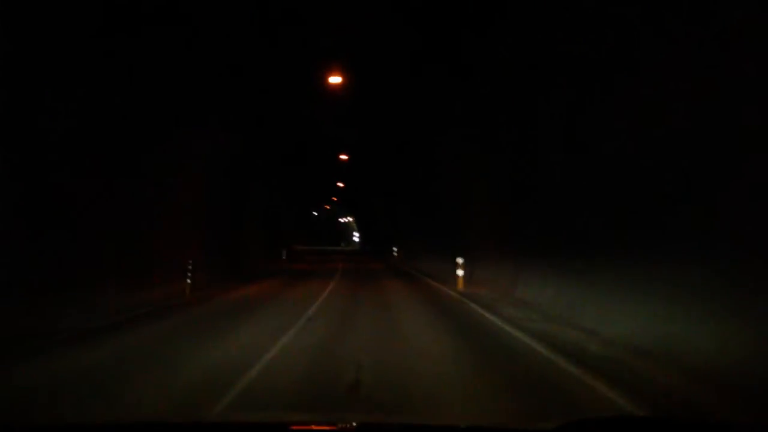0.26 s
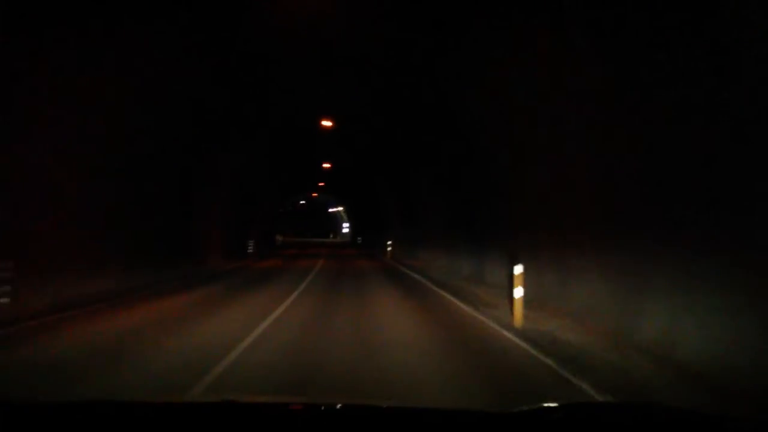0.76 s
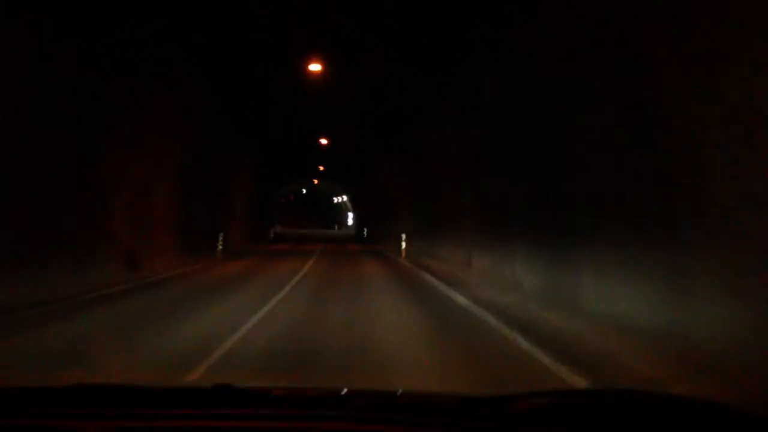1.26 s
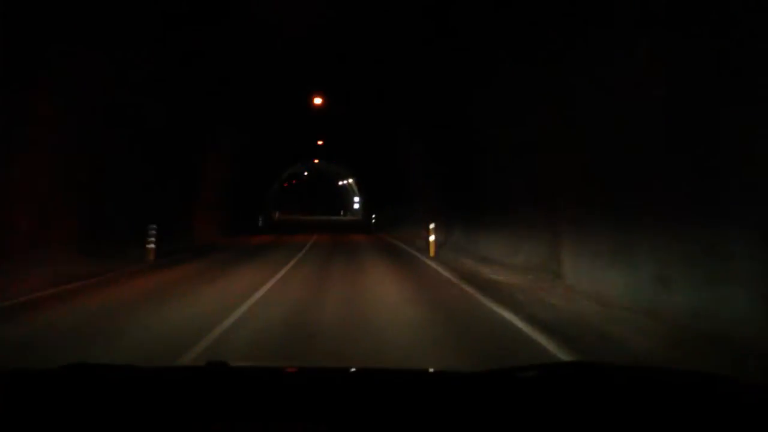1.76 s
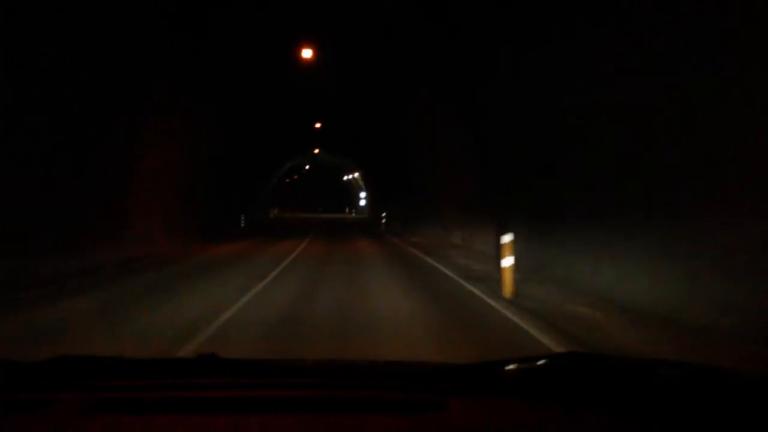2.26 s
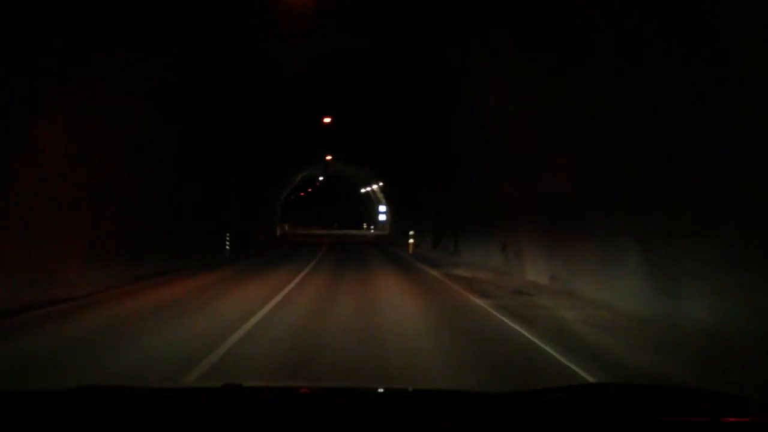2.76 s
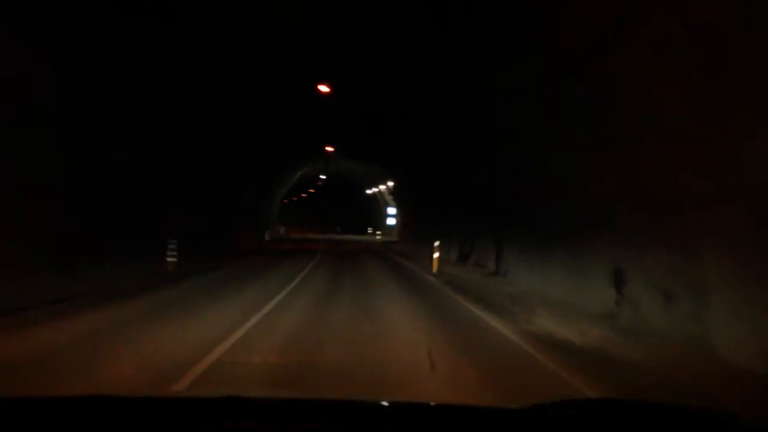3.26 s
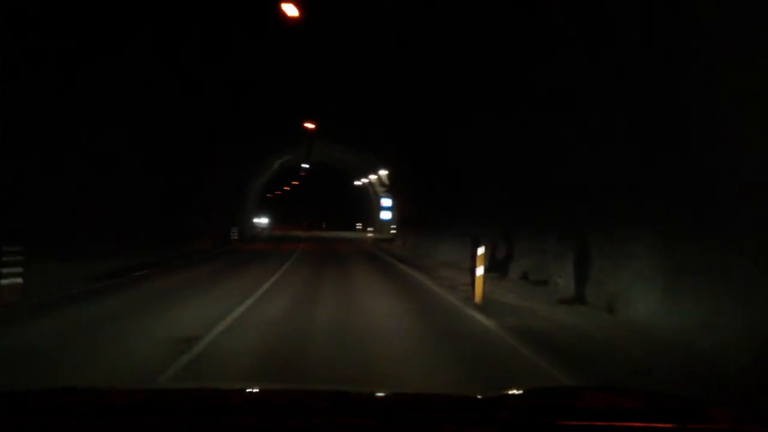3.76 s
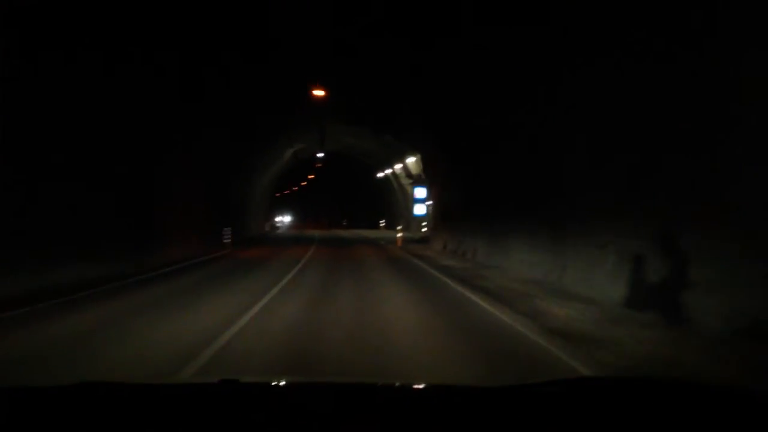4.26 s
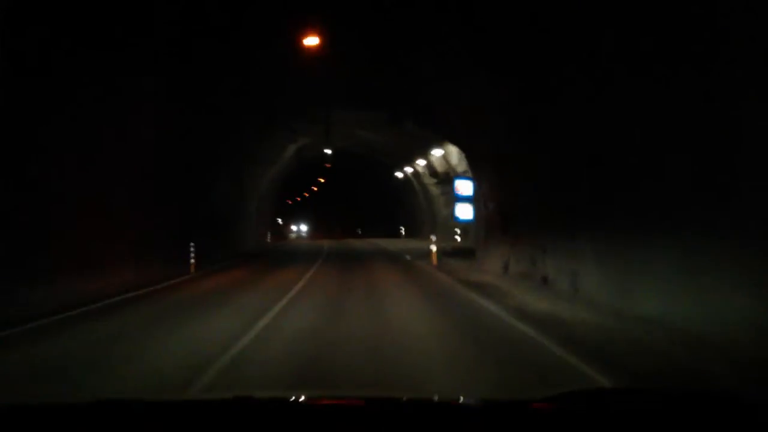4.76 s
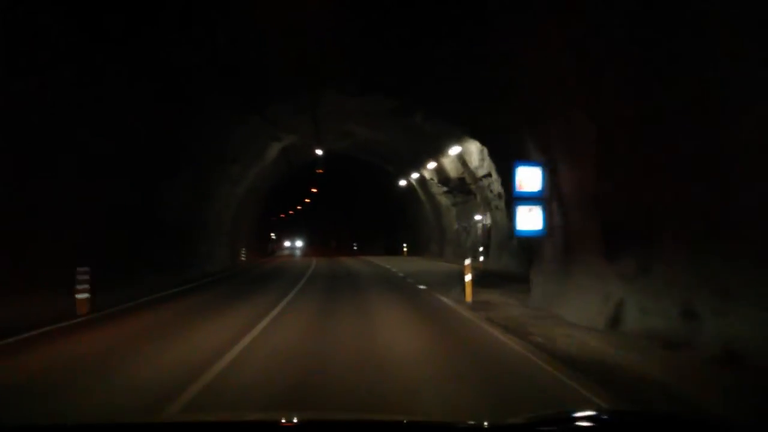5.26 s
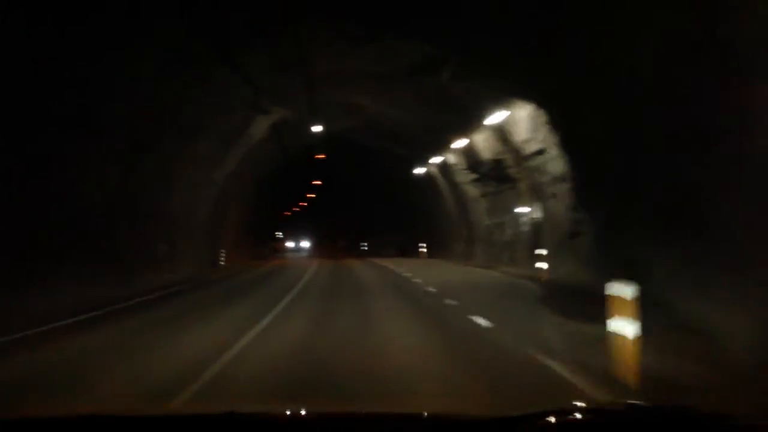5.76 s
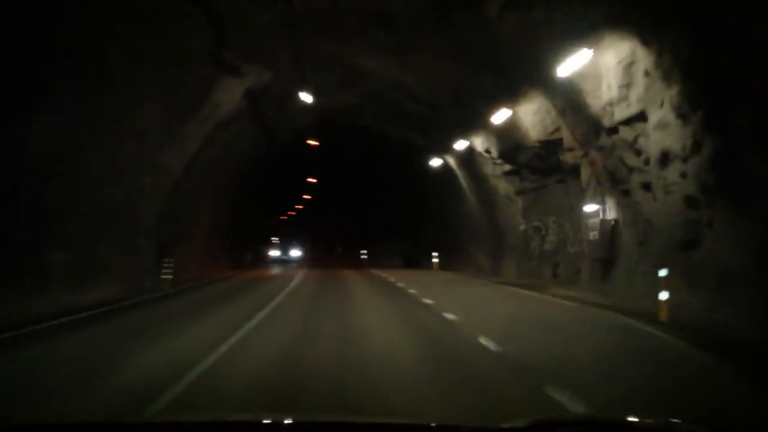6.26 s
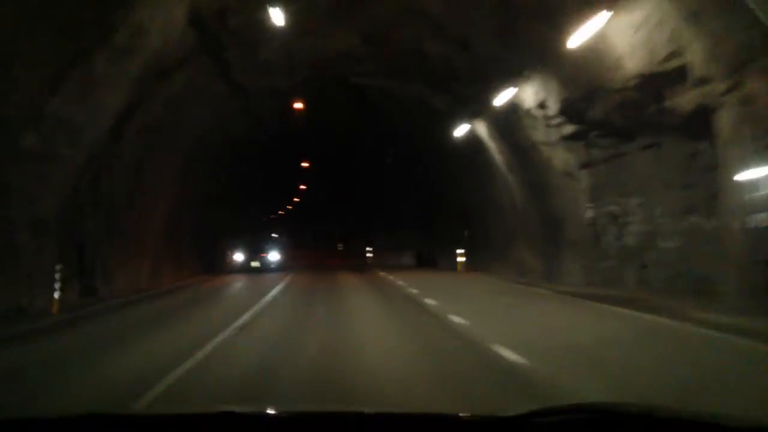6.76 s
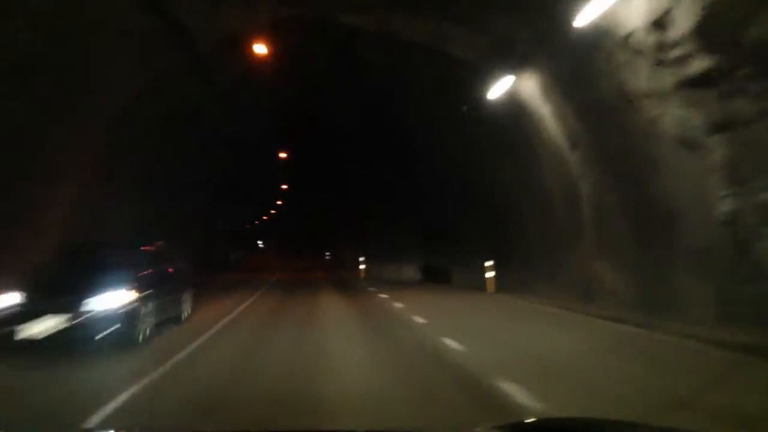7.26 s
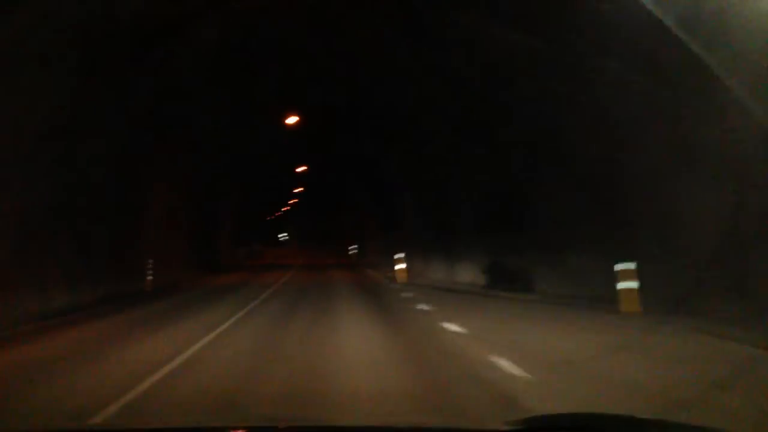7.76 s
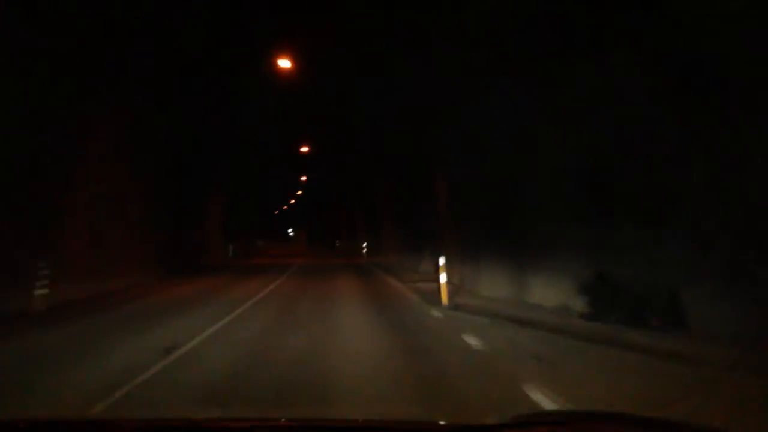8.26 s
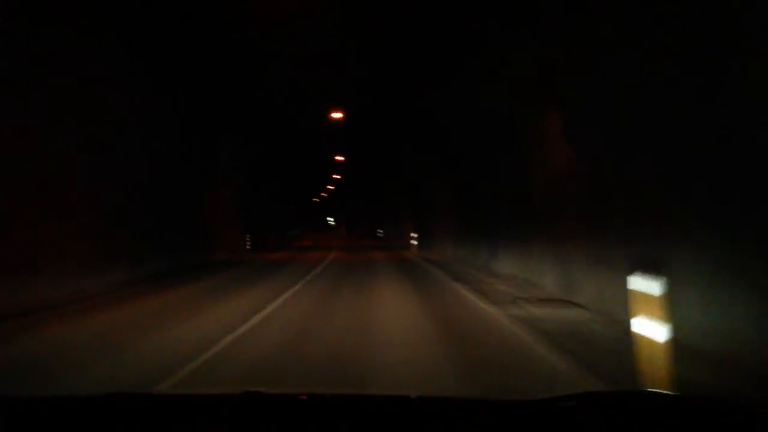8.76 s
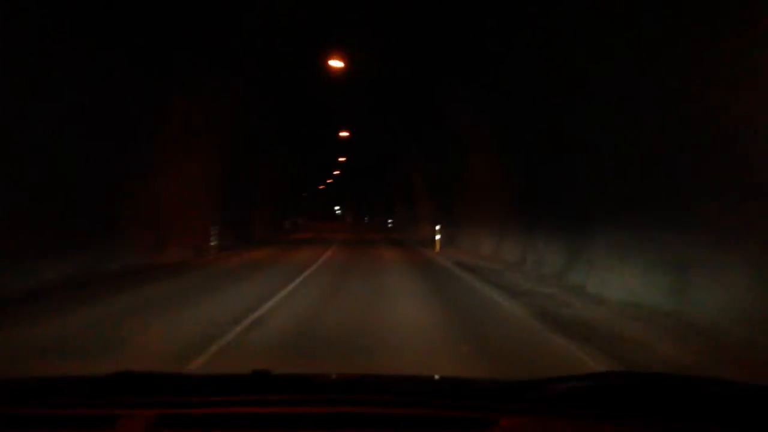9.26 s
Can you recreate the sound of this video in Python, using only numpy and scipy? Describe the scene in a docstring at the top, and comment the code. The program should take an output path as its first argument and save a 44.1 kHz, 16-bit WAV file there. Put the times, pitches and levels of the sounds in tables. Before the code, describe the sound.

A microphone behind the windscreen catches a car driving steadily through a tunnel. Low boomy rumble and tyre roar dominate, treble dulled by the glass. Soft thuds cluster in the middle, with a sharp little click around three and a half seconds. Another car's roar builds slowly, rushes by in a brief buffeting whoosh just before eight seconds, then drops away to calmer cruising.

```python
"""Inside a car cruising through a rock tunnel: rough asphalt booms in the cabin over a low engine drone.
Bumps thud, tyres roar and air hisses at the seals: noise shaped by resonances, over sine waves for the engine.
From about 2.4 s something in the cabin ticks a few times, each a short burst of noise in one resonance,
the loudest (near 3.49 s) in two at once. The road turns smoother near 7 s, just as an oncoming car swells up;
it whooshes past, abreast near 7.7 s, as several bands of noise that rise and fall around that moment."""
import sys
import numpy as np
from scipy import signal
from scipy.fft import rfft, irfft
from scipy.io import wavfile
from scipy.ndimage import uniform_filter1d, map_coordinates

SR = 44100
rng = np.random.default_rng(int(sys.argv[2]) if len(sys.argv) > 2 else 0)


def persist_wave(psi):
    """Save psi, clipped to +-1, as 16-bit WAV."""
    counts = np.round(np.clip(psi, -1, 1) * 32767).astype(np.int16)
    wavfile.write(sys.argv[1], SR, np.atleast_2d(counts).T)


N = 419832
TIME = np.arange(N) / SR  # seconds
HZ = np.fft.rfftfreq(N, 1 / SR)

# booming resonances of the body and cabin air: columns pitch_hz, width_hz, relative_db
BOOM_MODES = [(101.9, 11.6, -2), (137.2, 12.2, 0.5), (155, 17, -7.5), (182.8, 27.5, -5), (219.4, 23, -10),
              (246.6, 21, -10)]
# drumming resonances of the panels: columns pitch_hz, width_hz, relative_db
DRUM_MODES = [(247, 24, -1.6), (307.6, 29, 0.92)]
# humming resonances of the tyre walls: columns pitch_hz, width_hz, relative_db
WALL_MODES = [(390.2, 44.3, 0.54), (417, 36, -11), (488, 42.5, -3.5), (567, 41, -11.5)]
# sharper bumps in the asphalt: columns start_s, relative_db, broken_patch_s (length of the patch behind)
BUMPS = [(0.016, -12, .3), (1.148, -14, .045), (1.59, -17, .03), (2.369, -11, 0.035), (2.62, -10, 0.099),
         (2.834, -6.5, .07), (3.03, -11.5, 0.14), (3.44, -9, 0.032), (3.748, -8, .051), (4.071, -8.5, 0.18),
         (4.25, -9.5, 0.066), (5.105, -8, 0.075), (5.741, -10.5, 0.036), (6.236, -6, 0.064),
         (6.312, -8.5, 0.08), (6.433, -10.5, 0.032), (6.78, -16, .1), (8.988, -16, .064)]


def gain_of(db):
    """Turns decibels into amplitude."""
    return 10 ** (np.asarray(db) / 20)


def level(rows, axis=1):
    """Gain along time, drawn through one dB column of a table whose first column is time."""
    columns = np.transpose(rows)
    return gain_of(np.interp(TIME, columns[0], columns[axis]))


def noise(colour):
    """Noise of rms 1 with the given strength at each frequency."""
    x = irfft(rfft(rng.standard_normal(N)) * colour, N)
    return x / np.std(x)


def drift(hz):
    """Slow random curve of rms 1, with changes up to about hz times a second."""
    coarse = TIME[::50]
    rates = np.fft.rfftfreq(len(coarse), coarse[1])
    slow_only = np.exp(-(rates / hz) ** 2)
    x = irfft(rfft(rng.standard_normal(len(coarse))) * slow_only, len(coarse))
    return np.interp(TIME, coarse, x / np.std(x))


def spectrum(points):
    """Strength at each frequency, drawn through (Hz, dB) points and falling away beyond both ends."""
    hz, db = np.transpose(points)
    skirts = np.minimum(HZ / hz[0], 1) ** 2 / np.maximum(HZ / hz[-1], 1) ** 4
    return gain_of(np.interp(np.log(HZ + 1), np.log(hz), db)) * skirts


def resonances(modes):
    """Strength at each frequency of a set of steep-sided resonances, added as power."""
    power = 0
    for hz, width, db in modes:
        power = power + gain_of(db) ** 2 / (1 + ((HZ - hz) / width) ** 2) ** 2
    return np.sqrt(power)


def wandering(x, spread=.022, hz=3):
    """Lets a sound's pitch drift up and down by a small share, by reading it at an uneven speed."""
    place = np.cumsum(1 + spread * drift(hz))
    return map_coordinates(x, [place], order=3, mode="wrap")


def scattered(x, patchy_db=2.6, smooth_hz=2800):
    """Echoes off the passing rock walls strengthen and cancel narrow bands in turn; the treble stays smooth."""
    hz, _, z = signal.stft(x, nperseg=2048, noverlap=1536, boundary="even")
    # random patches, blurred over 4 bands and 8 time steps
    patches = uniform_filter1d(rng.standard_normal(z.shape), size=4, axis=0)
    patches = uniform_filter1d(patches, size=8, axis=1)
    depth_db = patchy_db / np.hypot(1, (hz[:, None] / smooth_hz) ** 2)
    gains = gain_of(depth_db * patches / np.std(patches))
    y = signal.istft(z * gains, nperseg=2048, noverlap=1536)[1][:N]
    return y / np.std(y)


def glass(hz=2580):
    """Side windows and trim shut out the treble steeply above hz."""
    return 1 / np.sqrt(1 + (HZ / hz) ** 16)


def swell(s, width_s):
    """A bell-shaped rise and fall around one moment."""
    return np.exp(-((TIME - s) / width_s) ** 2)


def surface(axis=1, joint_s=0.025):
    """One column of the asphalt table along time; the wheels cross each joint quickly."""
    # stretches of asphalt under the wheels: columns start_s, coarseness_db, panel_drumming_db (relative),
    # high_note_share (0-1, part of the tread roar's power in its higher note)
    stretches = [(0, -23.5, -35, 0.21), (.62, -25, -34.5, 0.33), (1.7, -28.5, -33, 0.58),
                 (2.2, -31, -31.5, .5), (2.36, -24.5, -34.5, 0.28), (4.35, -23, -31, 0.1),
                 (4.7, -23.5, -34.5, 0.21), (5.6, -24, -39.5, 0.1), (6.55, -25, -39, .14),
                 (6.92, -28.5, -46, 0), (7.7, -32.5, -46, 0.02), (8.98, -28, -38, 0.09)]
    columns = np.transpose(stretches)
    value = columns[axis][0]
    for s, step in zip(columns[0][1:], np.diff(columns[axis])):
        value = value + step * (1 + np.tanh((TIME - s) / joint_s)) / 2
    return value


def road_force(broken_db=-11.0, attack_s=0.0094):
    """The asphalt's steady texture, plus a surge over the broken patch behind each bump."""
    power = gain_of(surface()) ** 2
    for s, db, length in BUMPS:
        t = np.maximum(TIME - s, 0)
        patch = np.minimum(t / attack_s, 1) * np.exp(-(t / length) ** 4)
        power = power + (gain_of(db + broken_db) * patch) ** 2
    return np.sqrt(power)


def rocking(steady_db=-25.0, uneven_db=2.0, follows=0.34):
    """The body always shakes a little, more on coarse asphalt, and heaves in each dip."""
    # dips in the road that rock the body: columns middle_s, half_length_s, relative_db
    dips = [(.07, 0.089, -24.5), (0.347, .09, -22.5), (0.584, 0.059, -25.5), (1.502, 0.18, -24),
            (2.547, 0.24, -22.5), (3.323, 0.098, -26), (3.774, 0.078, -20), (4.528, 0.099, -28),
            (9.297, 0.23, -27.5)]
    # follows: dB of steady shake per dB of coarseness
    power = gain_of(steady_db + follows * surface() + uneven_db * drift(5.5)) ** 2
    for s, width, db in dips:
        power = power + (gain_of(db) * swell(s, width)) ** 2
    return np.sqrt(power)


def rumble(lumpy_db=1.5, shake_db=-1.5, wall_db=-1.05, drum_db=-0.56, grit_waver_db=2.5, drum_follows=.45):
    """Uneven asphalt drives the body, the cabin air, the panels and the tyre walls."""
    # low shaking resonances of the body: columns pitch_hz, width_hz, relative_db
    shake_modes = [(28.2, 6.6, -1), (38, 10, -6.5), (52.8, 5.9, 1.5), (73.4, 7.5, -5.5)]
    # tyre walls' hum, which follows the fine grit of the road: columns time_s, relative_db
    grit = [(0, -30.5), (.55, -32), (1.3, -29.5), (1.55, -34), (2.2, -35), (2.48, -38), (2.95, -34),
            (3.4, -34.5), (4.03, -38.5), (4.4, -31), (4.8, -39), (5.25, -34.5), (5.7, -36.5), (6.02, -30.5),
            (6.22, -37.5), (6.65, -30.5), (7.1, -34), (7.5, -37.5), (8.5, -39.5), (9.05, -34), (9.5, -36)]
    force = road_force()
    boom = noise(resonances(BOOM_MODES)) * force * gain_of(lumpy_db * drift(14))
    shake = noise(resonances(shake_modes)) * rocking() * gain_of(shake_db)
    # broken patches shake the panels too
    surge = (force / gain_of(surface())) ** drum_follows
    drumming = surge * gain_of(surface(axis=2) + drum_db + lumpy_db * drift(12))
    panels = wandering(noise(resonances(DRUM_MODES)), spread=.04) * drumming
    hum_level = level(grit) * gain_of(wall_db + grit_waver_db * drift(16))
    walls = wandering(noise(resonances(WALL_MODES)), spread=.03) * hum_level
    return boom + shake + panels + walls


def engine(crank_hz=26.15, wander=0.00299, waver_db=2.0):
    """A four-cylinder at nearly steady low revs: sine waves at multiples of its turning speed, each wavering."""
    # engine tones: columns multiple_of_crank_speed, rms_db (middle of the waver)
    orders = [(1, -40.5), (2, -41.5), (4, -43), (6, -43), (14, -49.5)]
    turns = np.cumsum(crank_hz * (1 + wander * drift(1.19))) / SR
    drone = np.zeros(N)
    for multiple, db in orders:
        tone = np.sin(2 * np.pi * (multiple * turns + rng.random()))
        drone += np.sqrt(2) * gain_of(db + waver_db * drift(7.6)) * tone  # root 2: sine peak from rms
    return drone


def rush(tread_db=3.5, air_db=-3.0, flutter_db=1.29, air_flutter_db=1.0, fizz_waver_db=1.5):
    """Tread roar muffled by the glass, with hiss and fizz leaking through the seals."""
    # tread resonances, lower and higher note: columns pitch_hz, width_hz, relative_db
    low_modes = [(596, 46, -5.5), (730, 58, -2.5), (792, 45, 0), (871, 56, 0), (991, 52, -5.5),
                 (1131, 38, -8.5), (1271, 88, -12.5), (1416, 92, -16.5), (1674, 100, -12.5),
                 (1898, 140, -19), (2105, 354, -23.5)]
    high_modes = [(880, 68, -1.5), (997, 54, 6.5), (1137, 60, 0), (1210, 66, -15)]
    # tread roar and air hiss along time: columns time_s, tread_relative_db, air_relative_db
    rush_levels = [(0, -41.5, -60), (.5, -40.5, -60), (1.1, -41, -61.5), (1.6, -39.5, -63),
                   (2.2, -41, -64.5), (2.45, -42.5, -65), (2.9, -43.5, -65.5), (3.3, -43, -63.5),
                   (3.68, -41, -59.5), (4.3, -41.8, -64), (4.55, -43, -67), (5.1, -42.5, -65),
                   (5.45, -38.5, -63), (5.64, -40, -60.5), (5.9, -39.5, -61.7), (6.4, -37, -62.3),
                   (7.05, -38.5, -60.5), (8.1, -39.5, -60.5), (9, -39.5, -62), (9.25, -38.5, -60.5),
                   (9.5, -40, -59.5)]
    # colour of the air hiss, then of the thin fizz at the seals: columns pitch_hz, relative_db
    air_colour = [(2000, -9.5), (2900, -4), (3220, -8.5), (3550, -5), (3950, -1.5), (4800, -2.5),
                  (5800, -4), (7200, -11), (9500, -18.5), (16000, -30)]
    fizz_colour = [(5000, -21.5), (8000, -7.5), (10000, -5), (13000, 0), (15700, -1.5)]
    # fizz along time, with one broad swell just ahead of the other car: columns time_s, level_db
    fizz_levels = [(0, -72), (2.05, -73.5), (2.16, -70), (2.35, -74), (2.93, -79), (3.12, -73), (3.3, -77),
                   (3.62, -66), (4, -76.5), (4.33, -75), (4.5, -79), (4.66, -74.5), (5.2, -78),
                   (5.85, -72.5), (6.2, -74.5), (6.7, -72.5), (6.9, -64), (7.1, -63.5), (7.4, -70),
                   (8.2, -73), (8.75, -74), (9, -70), (9.5, -68.5)]
    share = np.clip(surface(axis=3), 0, 1)  # the road surface shifts the tread's note
    low_note = noise(resonances(low_modes) * glass())
    high_note = noise(resonances(high_modes) * glass())
    both_notes = np.sqrt(1 - share) * low_note + np.sqrt(share) * high_note
    roar = scattered(wandering(both_notes), patchy_db=2.5)
    tread = roar * level(rush_levels) * gain_of(tread_db + flutter_db * drift(31))
    airflow = level(rush_levels, axis=2) * gain_of(air_db + air_flutter_db * drift(24))
    air = scattered(noise(spectrum(air_colour)), patchy_db=2.5) * airflow
    fizz = noise(spectrum(fizz_colour)) * level(fizz_levels) * gain_of(fizz_waver_db * drift(12))
    return tread + air + fizz


def bumps(thud_db=-5.5, contact_s=0.0066, knock_db=-11.0):
    """A wheel meets a bump: the cabin rings with a dull thud, panels and tyre walls with a fainter knock."""
    t = np.arange(SR // 4) / SR
    modes = list(BOOM_MODES)
    for hz, width, db in list(DRUM_MODES) + list(WALL_MODES):
        modes.append((hz, width, db + knock_db))
    thud = np.zeros(len(t))
    for hz, width, db in modes:
        thud += gain_of(db) * np.exp(-np.pi * width * t) * np.sin(2 * np.pi * hz * t)
    thud = thud * (1 - np.exp(-(t / contact_s) ** 2))  # the soft tyre rounds off the blow
    blows = np.zeros(N)
    for s, db, _ in BUMPS:
        blows[int(s * SR)] = gain_of(db + thud_db)
    return signal.oaconvolve(blows, thud / abs(thud).max())[:N]


def ticks(echo_s=0.1):
    """Small hard parts click: a short burst, then a faint tail; the loudest click rings in two resonances."""
    # one resonance of a click per row (the rows at 3.486 and 3.487 s make one click):
    # columns start_s, level_db, pitch_hz, width_hz, rise_s, decay_s, cabin_echo_db (against the burst)
    clicks = [(2.425, -63, 4760, 3500, .004, .012, -18), (3.486, -36.8, 13900, 2400, .0003, .006, -30),
              (3.487, -56.5, 3970, 140, .002, .018, -17), (3.625, -49, 6050, 460, .004, .006, -10),
              (4.593, -52, 4500, 6800, 0.0036, .004, -10.5), (7.04, -61, 5500, 5000, .012, .025, -22),
              (9.184, -61, 6000, 8000, .003, .012, -14)]
    out = np.zeros(N)
    for s, db, hz, width, rise, decay, echo_db in clicks:
        t = np.maximum(TIME - s, 0)
        burst = np.exp(-np.maximum(t - rise, 0) / decay)
        tail = gain_of(echo_db) * np.exp(-t / echo_s)
        envelope = np.minimum(t / rise, 1) * (burst + tail)
        out += gain_of(db) * envelope * noise(resonances([(hz, width, 0)]))
    return out


def alongside(s, width_s):
    """Gain of a passing source: its distance, and the slant at which it meets the side window."""
    return 1 / (1 + ((TIME - s) / width_s) ** 2) ** 1.13


def oncoming(abreast_s=7.672, passing_s=0.098, near_db=-25.5, buffet_db=2.5,
             slip_db=-50.0, slip_lead_s=0.023, slip_s=0.11, far_db=-32.0, approach_s=0.89, leave_s=0.17,
             bright_db=-39.0, bright_lead_s=0.21, bright_s=0.17):
    """The tunnel carries the other car's roar ahead of it, brighter over the last metres;
    its nose brings a hiss of air, its wheels a buffeting roar."""
    # colour of its roar from afar, then from close by: columns pitch_hz, relative_db
    far_colour = [(450, -23), (640, -12.5), (780, 7.5), (890, -5.5), (1000, -1.5), (1180, -15.5),
                  (1400, -9), (1650, -8), (1950, -12), (2600, -36.5), (3200, -47.5), (4000, -35),
                  (8000, -56)]
    near_colour = [(450, -20), (640, -11.5), (740, 3.5), (900, -5), (1100, -2.5), (1400, -10), (1600, -16),
                   (2100, -17), (2700, -34.5), (3150, -45.5)]
    # resonances of its tyres, heard from the front: columns pitch_hz, width_hz, relative_db
    front_modes = [(1430, 130, -2), (1640, 120, 0), (1900, 190, -2)]
    # colour of the air it pushes aside: columns pitch_hz, relative_db
    slip_colour = [(3300, -11.5), (4000, 0), (6000, -7.5), (9000, -19), (13000, -12.5), (15700, -10.5)]
    t = TIME - abreast_s
    carried = np.exp(np.where(t < 0, t / approach_s, -t / leave_s))  # slow rise, quick fall
    far_roar = scattered(wandering(noise(spectrum(far_colour)), spread=.025), patchy_db=1.0)
    far = carried * gain_of(far_db) * far_roar
    bright_roar = scattered(noise(resonances(front_modes) * glass()), patchy_db=3.0)
    bright = swell(abreast_s - bright_lead_s, bright_s) * gain_of(bright_db) * bright_roar
    near_roar = scattered(noise(spectrum(near_colour)), patchy_db=3.0)
    near = alongside(abreast_s, passing_s) * gain_of(near_db + buffet_db * drift(45)) * near_roar
    hiss = scattered(noise(spectrum(slip_colour)), patchy_db=2.5)
    slip = alongside(abreast_s - slip_lead_s, slip_s) * gain_of(slip_db) * hiss
    return far + bright + near + slip


def scene():
    """Everything as heard behind the windscreen, in one channel."""
    return (rumble() + engine() + rush() + bumps() + ticks() + oncoming())[None]


def record(dry, cutoff_hz=15900):
    """Softens both ends, then removes what lies above the cutoff."""
    eased = dry * signal.windows.tukey(N, .002)
    lowpass = signal.firwin(511, cutoff_hz, window=("kaiser", 9), fs=SR)
    return signal.oaconvolve(eased, lowpass[None], "same")


dry = scene()
out = record(dry)
persist_wave(out)
```